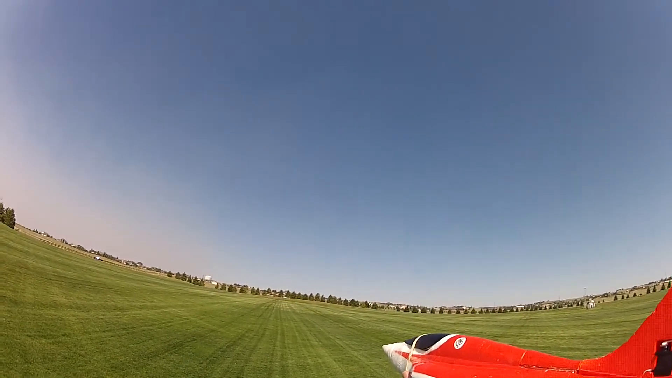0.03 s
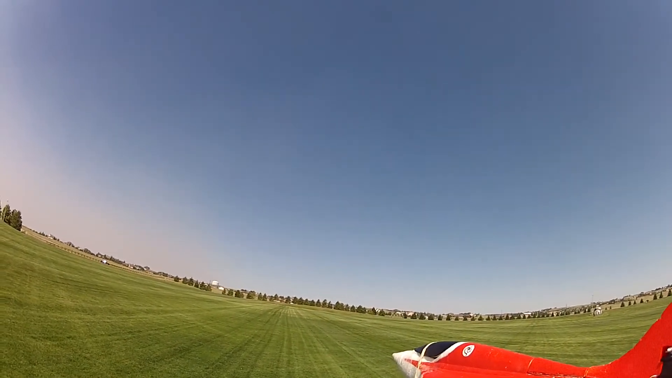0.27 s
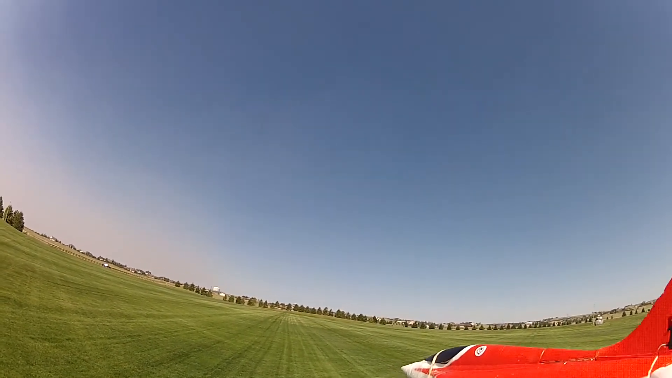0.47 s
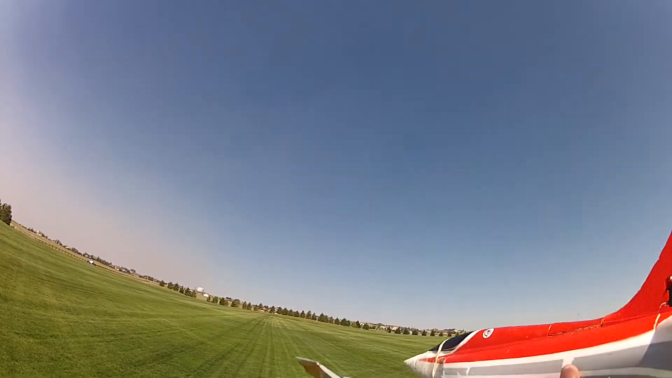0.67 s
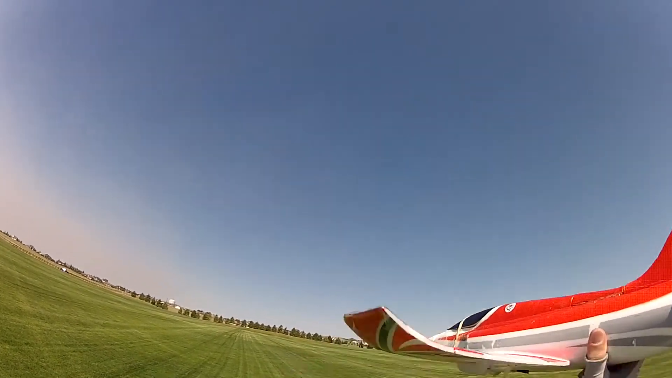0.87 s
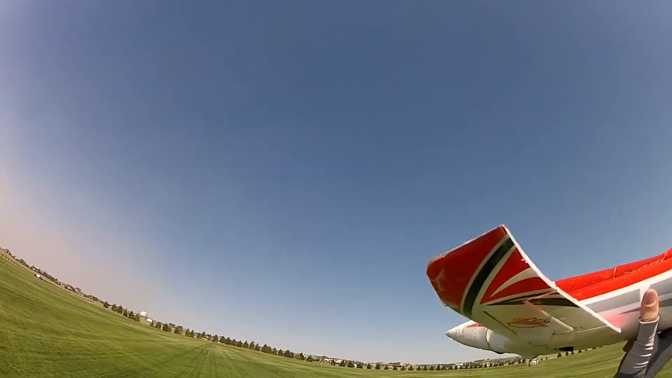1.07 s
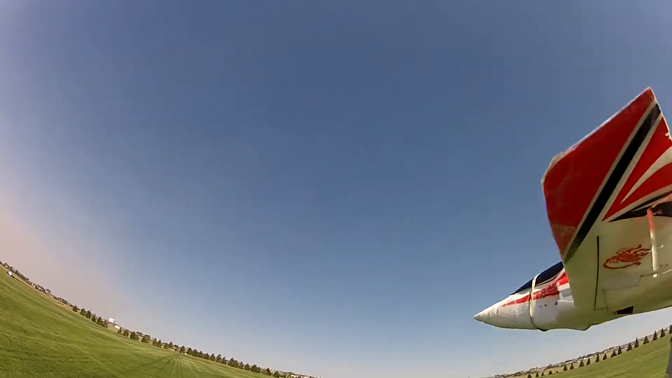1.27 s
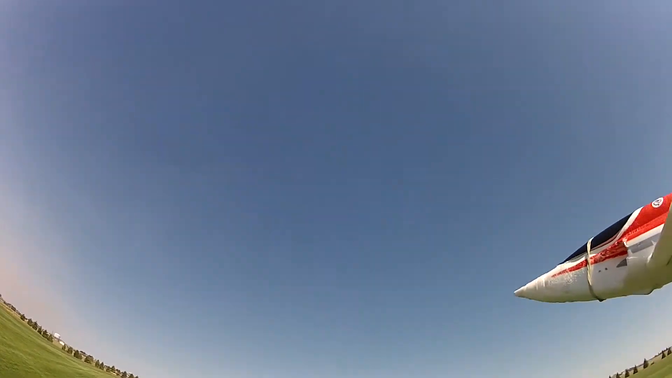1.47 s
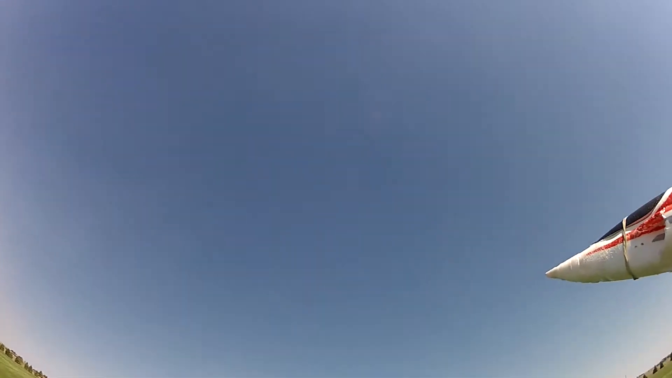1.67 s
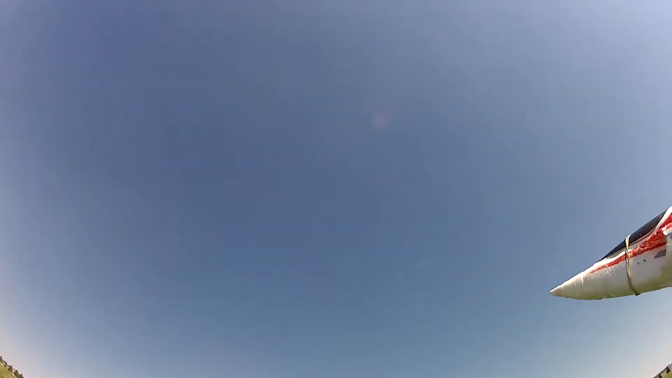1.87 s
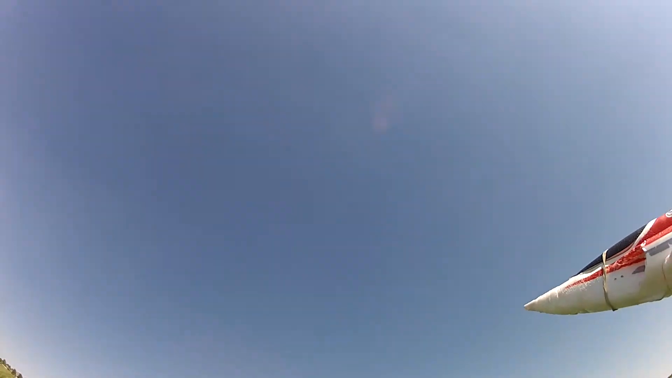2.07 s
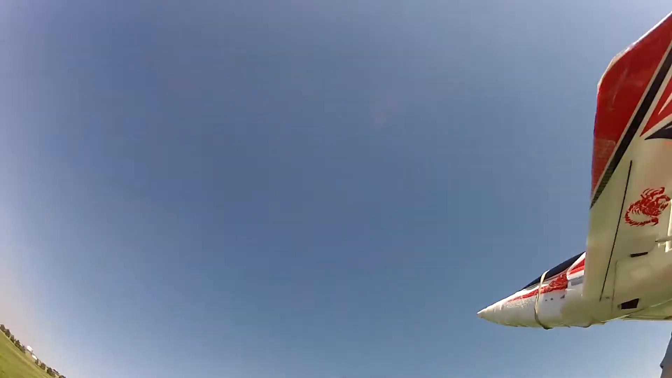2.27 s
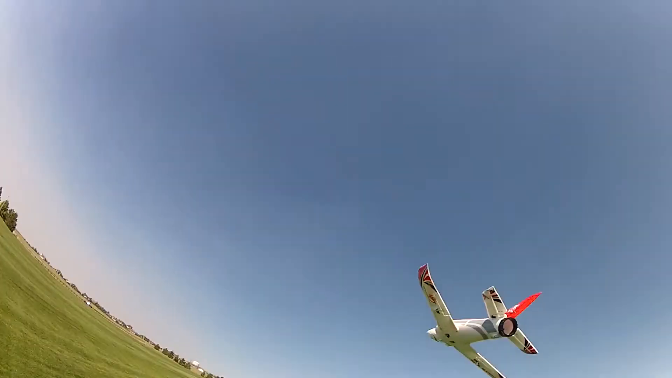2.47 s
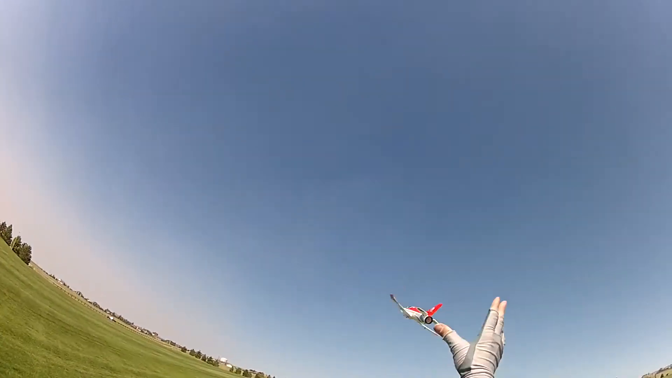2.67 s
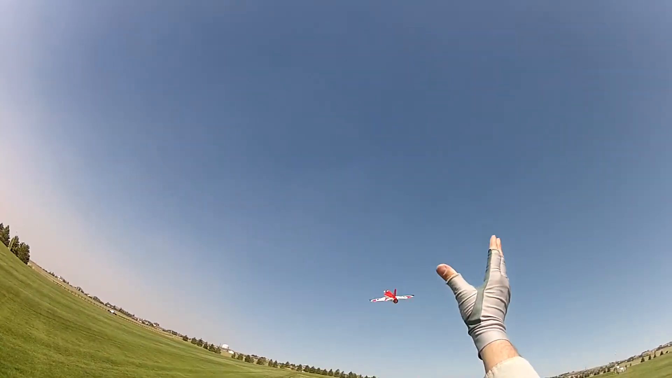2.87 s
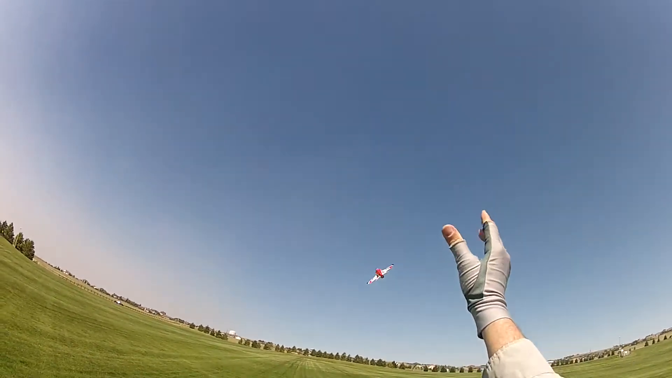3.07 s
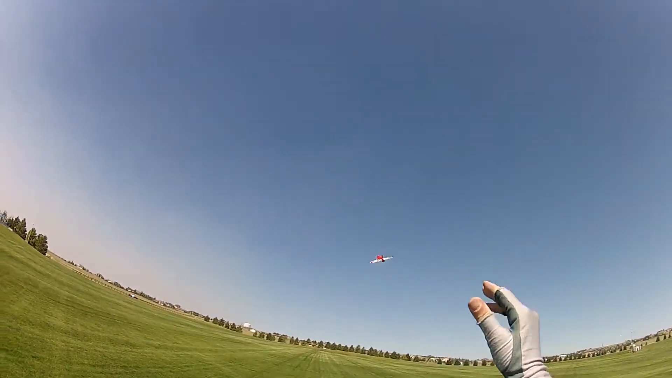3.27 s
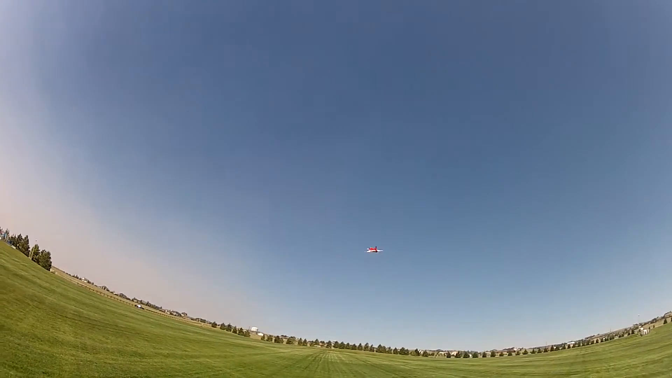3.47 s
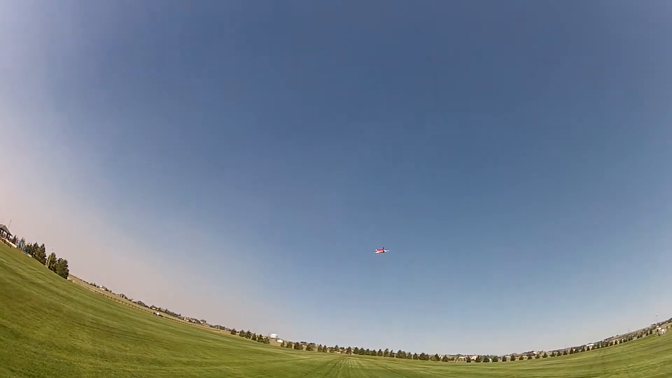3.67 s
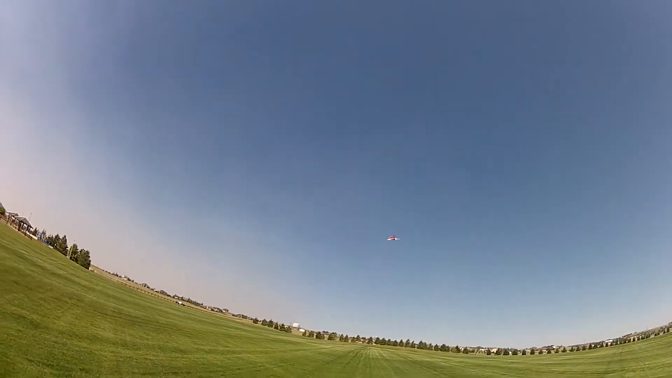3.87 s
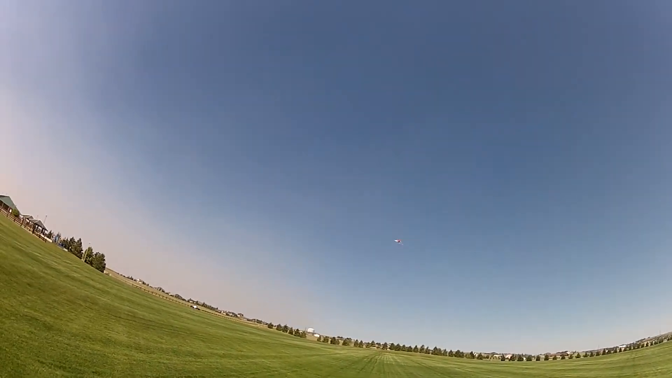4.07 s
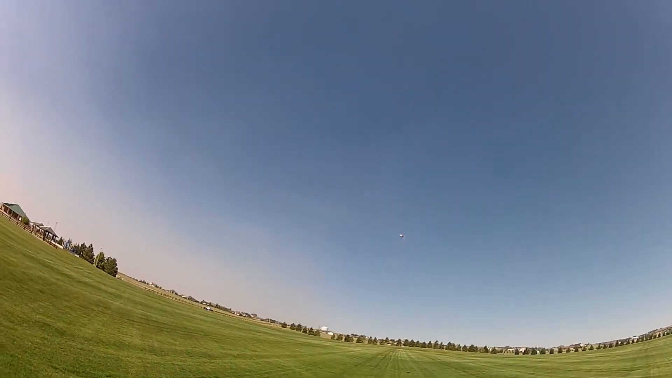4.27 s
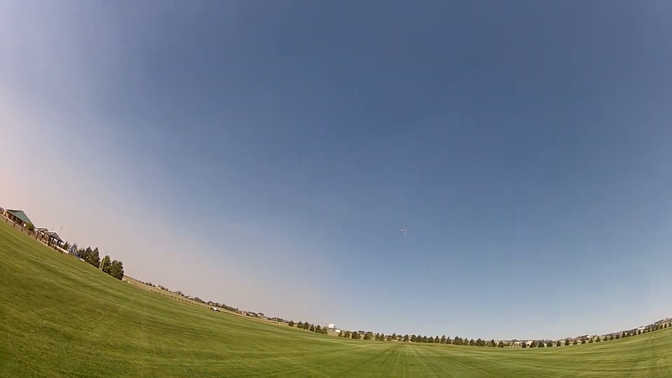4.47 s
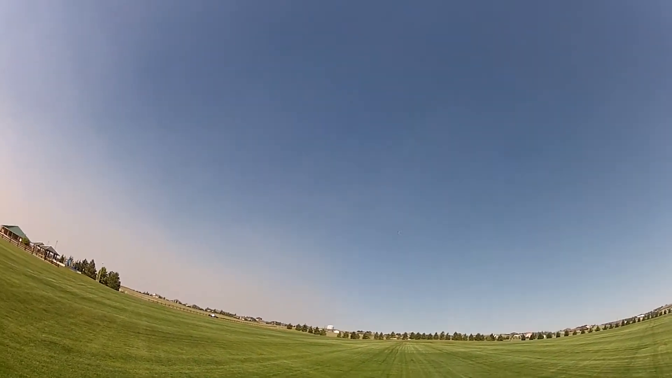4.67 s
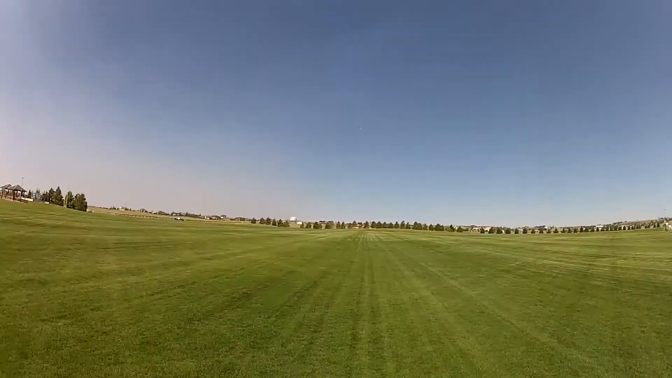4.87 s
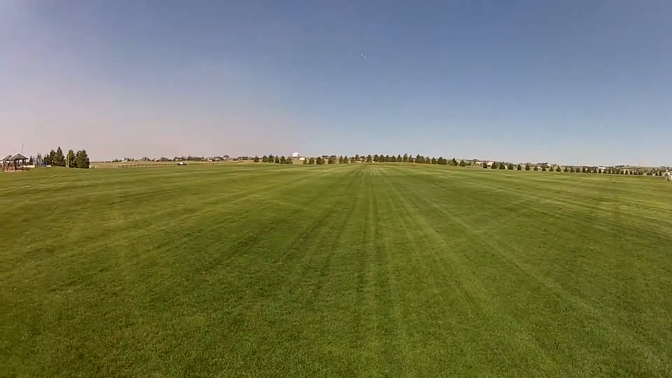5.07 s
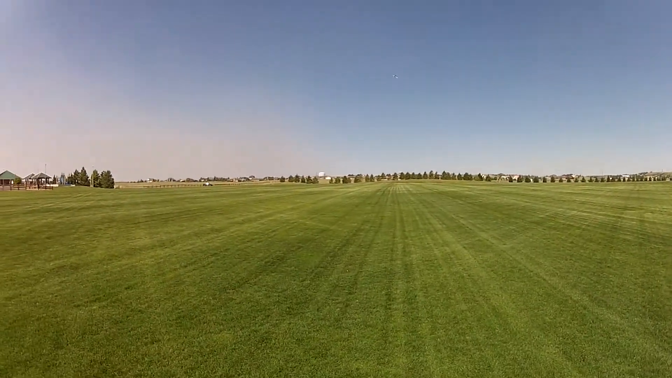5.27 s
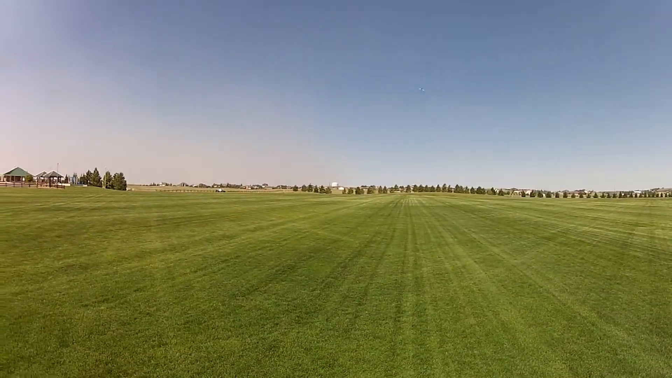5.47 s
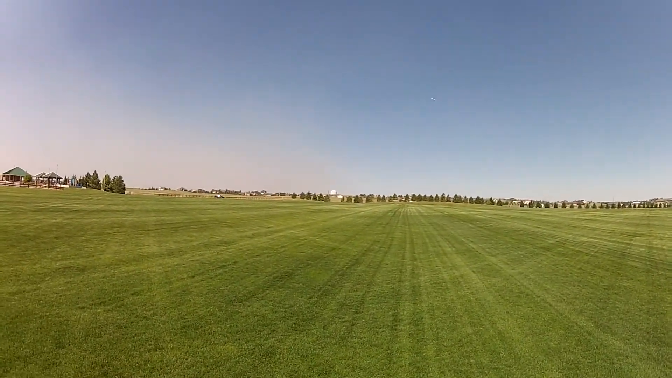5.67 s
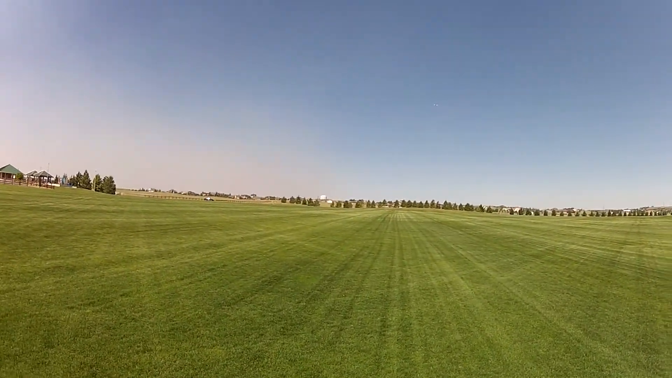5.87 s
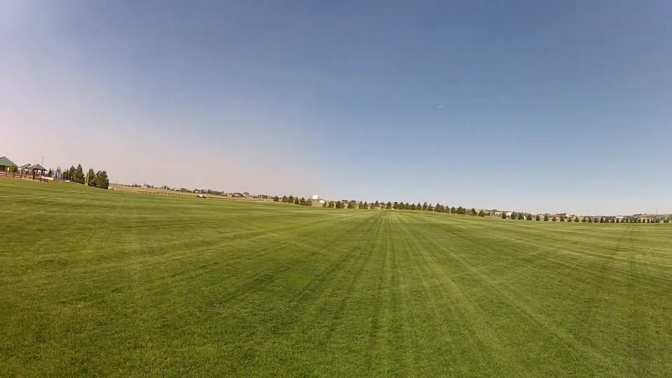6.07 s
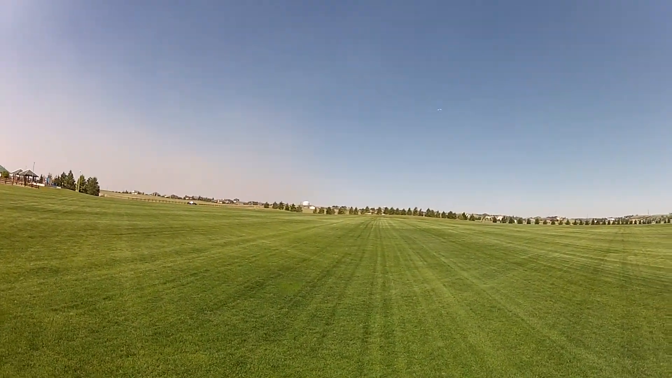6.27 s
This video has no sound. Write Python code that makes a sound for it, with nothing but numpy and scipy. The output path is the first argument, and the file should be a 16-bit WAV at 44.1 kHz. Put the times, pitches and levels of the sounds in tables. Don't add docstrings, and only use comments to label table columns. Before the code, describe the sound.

Outdoors on an open field, heard from a cased head-worn microphone with gritty, mirrored treble. From 0 to 0.3 s a small electric motor stutters and buzzes, chirping upward; by 0.5 s it has swept to a steady, piercing whine with a hum near 680 Hz and strong higher tones, over hissing, roaring duct air. It holds until 2.4 s, its tone shifting as the model is turned and raised from about 1.1 s, with low wind thumps and flutter. Around 2.5 s comes the throw: a deep double jolt, a gust and a flare of hiss. The whine dips slightly in pitch and fades fast. At 2.8 s a knock, at 3.0 s a soft bump and brief falling creak. A knock at 4.0 s; the distant whine wavers and thins, with a faint whistle. About 4.9-5.6 s, clicks, taps and a mount bump over hush and dying breeze until 6.3 s.

```python
import sys
import numpy as np
from scipy import signal
from scipy.fft import rfft, irfft
from scipy.io import wavfile
from scipy.ndimage import uniform_filter1d

SR = 44100
rng = np.random.default_rng(int(sys.argv[2]) if len(sys.argv) > 2 else 0)


def nominal_scale(level):
    x = np.asarray(level, float) / 20
    return 10 ** x


def put_to_file(sound):
    columns = np.atleast_2d(sound).T
    safe = np.clip(columns, -1, 1)
    whole_steps = np.round(safe * 32767)
    wavfile.write(sys.argv[1], SR, whole_steps.astype(np.int16))


N = 279064
T = np.arange(N) / SR


def in_time(rows):
    s, *columns = np.transpose(rows)
    return [np.interp(T, s, c) for c in columns]


def rms_one(x):
    return x / np.sqrt(np.mean(x ** 2) + 1e-20)


def band(x, low_hz, high_hz, order=2):
    return signal.sosfilt(signal.butter(order, [low_hz, high_hz], "band", fs=SR, output="sos"), x)


def noise():
    return rng.standard_normal(N)


def drift(rate_hz):
    r = np.exp(-80 * np.pi * rate_hz / SR)
    slow = signal.lfilter([1], [1, -2 * r, r * r], rng.standard_normal(N // 40 + 2002))[2000:]
    return np.interp(np.arange(N) / 40, np.arange(len(slow)), rms_one(slow))


def resonance(x, hz, width_hz):
    r = np.exp(-np.pi * width_hz / SR)
    b = np.array([1, 0, -1]) * (1 - r * r) / 2
    return signal.lfilter(b, [1, -2 * r * np.cos(2 * np.pi * hz / SR), r * r], x)


def sine(hz):
    return np.sin(2 * np.pi * np.cumsum(hz) / SR)


def swaying(rows):
    return sum(db * np.exp(-((T - s) / width_s) ** 2) for s, db, width_s in rows)


def surges(s, hold_s, db, rise_db_per_s, fall_db_per_s, calm_db):
    gain = nominal_scale(calm_db) + 0 * T
    for at, stay, top_db in zip(s, hold_s, db):
        near = slice(max(int((at - .5) * SR), 0), int((at + stay + .5) * SR))
        before = np.clip(at - T[near], 0, 1)
        after = np.clip(T[near] - at - stay, 0, 1)
        surge = nominal_scale(top_db - rise_db_per_s * before - fall_db_per_s * after)
        gain[near] = np.maximum(gain[near], surge)
    return uniform_filter1d(gain, size=round(SR * 4 / rise_db_per_s))


# frequency in Hz, density in dB per Hz.
FIELD_SPECTRUM = [(76, -33), (130, 5), (642, -9), (883, -15.5), (1960, -18.5), (2700, -19.5), (3020, -19),
                  (3270, -17), (3430, -21.5), (5110, -23.5), (5900, -29.5), (7670, -72), (13000, -120)]


def field():
    hz = np.maximum(np.fft.rfftfreq(N, 1 / SR), 1)
    corner_hz, corner_db = np.transpose(FIELD_SPECTRUM)
    shape_db = np.interp(np.log(hz), np.log(corner_hz), corner_db)
    hush = irfft(rfft(noise()) * nominal_scale(shape_db), N)
    return nominal_scale(-61.5 + 1.0 * drift(0.45)) * rms_one(hush)


# time in seconds, level in dB.
BREEZE = [(0, 2.5), (2.8, 0.2), (3.3, -4), (3.9, 1.5), (4.6, -3), (5.3, -4), (6.33, -8)]
CALM_DB = [-53, -49.5, -61]
# start in seconds, hold in seconds, deep buffet in dB, flutter in dB.
GUSTS = [(0, 0.054, -67, -41), (0.543, .01, -48, -60), (0.845, .01, -34.5, -41.5), (0.894, 0.044, -46, -42),
         (1.157, .01, -56, -40), (1.233, .03, -44.5, -56), (1.423, .02, -42.5, -57),
         (1.605, .04, -37, -47.5), (1.72, 0.008, -36, -50), (1.79, .04, -46, -42),
         (1.964, 0.0076, -38.5, -52), (2.13, 0.028, -44, -58), (2.303, .02, -42.5, -52),
         (2.386, 0.14, -27, -54), (2.68, 0.04, -37, -54), (2.788, .02, -42, -52), (3.104, .03, -38, -56),
         (3.438, .01, -49, -49), (3.564, 0.0072, -40.5, -52), (3.667, .01, -43.5, -43),
         (3.795, .01, -46, -55), (3.848, 0.024, -58, -40), (4.11, 0.035, -54, -45.5),
         (4.557, 0.19, -50, -50), (4.933, .01, -47, -50), (5.05, .01, -45, -56), (5.613, .01, -51, -58)]
# start in seconds, hold in seconds, rustle in dB.
WASH = [(.5, .05, -55.5), (1.55, 0.0084, -53.5), (1.853, 0.061, -52), (2.054, 0.34, -51),
        (2.537, .02, -51.5), (2.794, .01, -55.5), (3.8, 0.074, -53.5)]


def wind(lumpy_db=-1.5):
    rise, fall, wash_rise, wash_fall = 285, 170, 53, 49
    breeze_db, = in_time(BREEZE)
    deep_calm_db, flutter_calm_db, rustle_calm_db = [db + breeze_db for db in CALM_DB]
    deep_calm_db = deep_calm_db + np.interp(T, [.45, 0.74], [-19, 0])
    s, hold_s, deep_db, flutter_db = np.transpose(GUSTS)
    gust = nominal_scale(lumpy_db * drift(21))
    deep = rms_one(band(noise(), 9.9, 39.7) * nominal_scale(lumpy_db * drift(10)))
    flutter = rms_one(band(noise(), 38.0, 105.0, order=4) * gust)
    rustle = nominal_scale(-4.0) * rms_one(band(noise(), 163, 404) * gust)
    return (surges(s, hold_s, deep_db, rise, fall, deep_calm_db) * deep
            + surges(s, hold_s, flutter_db, rise, fall / 2, flutter_calm_db) * flutter
            + surges(*np.transpose(WASH), wash_rise, wash_fall, rustle_calm_db) * rustle)


# low Hz, high Hz, rattle share, t60 in seconds, rebound share.
CONTACTS = [
    (120, 3160, 0.9, 0.041, 0.37),
    (3480, 5350, 0.35, 0.011, .01),
    (1400, 2480, 1.9, 0.18, .01),
    (1000, 4000, .3, 0.01, .2),
    (150, 2300, .1, .006, .01),
]
# time in seconds, peak in dB.
TICKS = [
    [(2.799, -40.5), (4.0371, -36.5), (4.979, -39.5)],
    [(4.866, -50), (4.871, -51), (5.0254, -41.5), (5.0265, -46), (5.2067, -51), (5.283, -54), (5.585, -46)],
    [(5.031, -57), (5.085, -56)],
    [(5.112, -45), (5.598, -46)],
    [(5.2065, -38.5)],
]


def ticks():
    out, t = np.zeros(N), np.arange(3000) / SR
    push = 3 * np.exp(-t / .00007) + 0.45 * np.exp(-t / 0.0012)
    for (low_hz, high_hz, share, t60_s, rebound), hits in zip(CONTACTS, TICKS):
        for s, db in hits:
            burst = share * rng.standard_normal(3000) * nominal_scale(-60 * t / t60_s) - push
            burst = burst + rebound * np.interp(t - 0.001376, t, burst, left=0)
            at = round(s * SR)
            out[at:at + 3000] += 0.98 * nominal_scale(db) * band(burst, low_hz, high_hz, order=3)
    return out


# time in seconds, signed step, rise in seconds, ring in Hz, t60 in seconds.
BUMPS = [
    (2.48, -0.11, 0.00089, 60, 0.056),
    (2.5016, -0.16, 0.00093, 59.5, 0.0095),
    (3.044, 0.11, 0.0039, 31.3, 0.245),
    (5.023, -0.087, 0.0029, 30.3, 0.037),
    (5.0255, 0.072, 0.0013, 32, 0.083),
]


def bumps():
    out = np.zeros(N)
    for s, step, rise_s, hz, t60_s in BUMPS:
        since = np.clip(T - s, 0, 1)
        swing = np.cos(2 * np.pi * hz * since) * nominal_scale(-60 * since / t60_s)
        out += step * np.tanh(since / rise_s) ** 2 * swing
    return out


# time in seconds, frequency in Hz, level in dB.
CREAK = [(3.012, 270, -74), (3.02, 240, -44), (3.04, 223, -46), (3.06, 194, -41), (3.075, 170, -70)]


def creak():
    hz, db = in_time(CREAK)
    sounding = (T > CREAK[0][0]) & (T < CREAK[-1][0])
    return sounding * nominal_scale(db) * sine(hz)


# time in seconds, frequency in Hz, level in dB.
WHISTLE = [(4.0, 2050, -86), (4.3, 2075, -72), (4.5, 2076, -77), (4.7, 2150, -76), (4.82, 2160, -81),
           (5.0, 2130, -88)]


def whistle(waver=0.00376):
    hz, db = in_time(WHISTLE)
    return nominal_scale(db + 3.5 * drift(18)) * sine(hz * (1 + waver * drift(14)))


# arrival in seconds, departure in seconds.
POSES = [(0, .285), (.333, .41), (.49, .6), (.75, 1.07), (1.44, 1.52), (1.72, 2.41), (2.49, 2.53),
         (2.63, 2.66), (3.0, 4.4), (5.0, 6.3)]


def by_pose(gains):
    flown_s = np.clip(T - 2.47, 0, None)
    metres = 1 + 9.8 * flown_s + 0.87 * flown_s ** 2 / 2
    return np.interp(T, np.sort(np.ravel(POSES)), np.repeat(gains, 2)) / metres


# time in seconds, shaft speed in Hz.
SPIN = [(0, 12), (.045, 28), (.1, 79), (.13, 100), (.17, 120), (.25, 153), (.277, 207), (.306, 320),
        (.315, 360)]
# time in seconds, shaft speed as heard in Hz.
SHAFT = [(0.305, 330.8), (0.38, 534), (0.42, 621), (0.47, 666), (0.52, 679.5), (0.62, 684.8), (1, 682.7),
         (1.2, 680.7), (1.7, 677.2), (2.3, 675.2), (2.4, 675.4), (2.47, 667.9), (2.6, 660.4), (2.75, 657.3),
         (3.05, 654.1), (4.2, 650.8), (5.4, 644.4), (6.33, 641.2)]


def flow(idle_hz=140, full_hz=685):
    speed_hz = np.where(T < SHAFT[0][0], in_time(SPIN)[0], in_time(SHAFT)[0])
    return (np.maximum(speed_hz, idle_hz) / full_hz) ** 1.42


# frequency in Hz, width in Hz, dB held low, dB raised to throw, dB flying away.
FUSELAGE = [(553, 195, -4, -3, -1), (905, 102, -2, -1, 1), (1105, 110, -4.5, -2, -1.5)]
DUCT = [(1493, 113, -10.5, -5.5, -7), (1653, 210, -6.5, -2, -10), (2152, 124, -0.2, 2.3, 2.9),
        (2605, 28, -11, -49, -16)]
NOZZLE = [(2906, 153, -3, 4.5, -9), (3375, 135, 0.5, 2, 5), (3568, 138, 1.5, 4, 4), (3830, 180, 2, 5, 3),
          (3970, 430, -3.5, 0.5, -5), (4290, 320, 0, 0, -22), (4453, 210, 3, 0.5, -12.5),
          (5040, 820, -10, -8.5, -15.5)]
# fuselage rumble, duct roar or nozzle hiss at one metre, in dB per pose.
RUSH_DB = [
    [-47, -50, -45.5, -48, -52.5, -53.5, -52, -52, -54, -48.5],
    [-42.5, -44, -45, -45, -50.5, -49.5, -51, -47, -50.5, -51],
    [-62, -52.5, -49, -52, -56, -56.5, -54.5, -44, -48, -52],
]
ATTITUDE_S = [1.1, 1.45, 2.45, 2.7]
# time in seconds, pitch ratio.
RECEDING = [(2.42, 1), (2.7, .992), (6.33, .988)]
# time in seconds, level in dB, width in seconds.
RUSH_SWAYS = [(.5, -1, 0.059), (2.05, -1, 0.2), (2.53, 3.5, 0.033), (2.8, 1.5, 0.055), (3.74, 2.5, 0.3)]


def airflow(patchy_db=0.79):
    read_at = np.cumsum(in_time(RECEDING)[0])
    common_db = swaying(RUSH_SWAYS) + patchy_db * drift(23.0)
    strength = flow()
    out = 0
    for pose_db, modes, lift_db in zip(RUSH_DB, (FUSELAGE, DUCT, NOZZLE), (1.5, 2.5, 5.0)):
        white, rush = noise(), 0
        for i, (hz, width_hz, low_db, raised_db, away_db) in enumerate(modes):
            aim_db = np.interp(T, ATTITUDE_S, [low_db, raised_db, raised_db, away_db])
            gain = (-1) ** i * nominal_scale(aim_db + patchy_db * drift(2.7))
            rush = rush + gain * resonance(white, hz, width_hz)
        rush = rms_one(np.interp(read_at, np.arange(N), rush))
        out = out + by_pose(nominal_scale(pose_db)) * strength * nominal_scale(lift_db + common_db) * rush
    return out


# frequency in Hz, width in Hz, lift given to a passing tone in dB.
SHELL = [
    (903, 59, 1),
    (2159, 31.5, 1),
]


def through_shell(tones):
    return tones + sum(nominal_scale(lift_db) * resonance(tones, hz, width_hz) for hz, width_hz, lift_db in SHELL)


# shaft multiple, dB off resonance,
# flare in the low mode in dB, flare in the high mode in dB, flare width in octaves.
POLES = [(18, -66.5, 15.5, 21.5, 0.24), (9, -80, 23, 3, .5), (6, -78, 9, 3, 0.22)]
THROTTLE_DB = [5.5, 0.1, 9]


def pole_whine():
    spin_hz = in_time(SPIN)[0]
    turn = 2 * np.pi * np.cumsum(spin_hz * (1 + 0.0094 * drift(48.0))) / SR
    whine = 0
    for (k, db, *flare_db, octaves), kick_db in zip(POLES, THROTTLE_DB):
        near_db = sum(flare * np.exp(-(np.log2(k * spin_hz / hz) / octaves) ** 2)
                      for flare, (hz, _, _) in zip(flare_db, SHELL))
        falter_db = -17 * (k > 7) * np.clip((T - 0.19) / 0.033, 0, 1)
        drive_db = np.where(T < .276, falter_db, kick_db)
        whine = whine + nominal_scale(db + near_db + drive_db + 3.5 + 1.8 * drift(44)) * np.sin(k * turn)
    return through_shell(whine)


# time in seconds, low mode in dB, high mode in dB.
JOLTS = [(0, -49.5, -70), (.04, -50, -66), (.07, -62, -55), (.11, -50.5, -57), (.2, -70, -51),
         (0.281, -55, -43.5), (.298, -60, -56)]


def cogging():
    shake = noise() * nominal_scale(1.5 * drift(40))
    s, *jolt_db = np.transpose(JOLTS)
    return sum(surges(s, 0 * s, db, 1000, 350, calm_db) * rms_one(resonance(shake, hz, width_hz))
               for db, calm_db, (hz, width_hz, _) in zip(jolt_db, [-68, -66.5], SHELL))


def motor_start():
    return (pole_whine() + cogging()) * np.clip((.31 - T) / 0.0042, 0, 1)


TONE_DB = {1: [-54, -49, -54, -41, -36.5, -34, -37, -40, -57, -50], 2: [-74, -54.5, -59.5, -63.5, -58,
           -57.5, -69, -82, -76, -65], 3: [-55, -57, -46, -47, -32.5, -32.5, -38, -38.5, -50, -49.5], 5:
           [-80, -48.5, -37, -37, -45.5, -52, -36, -29.5, -38, -33.5], 6: [-68, -66, -51.5, -56.5, -60,
           -64.5, -58, -55, -66, -66], 8: [-95, -90, -93, -67, -88, -64, -70, -81, -86, -80]}
REVERSED = {3: range(6, 10), 5: range(4, 6)}
SWAYS = {1: [(.338, 6.5, .015), (.415, -7.5, 0.024), (.46, 5.5, 0.043), (.52, -11, 0.035), (.63, -3, .05),
         (2.425, -7, 0.04), (2.7, -6.5, .035), (2.8, 0.5, .04), (2.92, -11, 0.065)], 2: [(.335, 7.5, 0.021),
         (.385, 12, 0.014), (1.3, -8, 0.17)], 3: [(.44, 1, 0.018), (.52, 4, 0.027), (1.1, -6, 0.09),
         (1.55, 3.5, 0.17), (2.4, 1.5, 0.12), (2.72, -6.5, 0.089), (2.86, 1.5, 0.031), (4.3, 5.5, 0.34),
         (5.05, -9, 0.22), (5.6, 1, .2)], 5: [(.318, -13, 0.011), (.338, 9, 0.0076), (.485, 4, 0.012),
         (1.62, -6, 0.1), (1.73, 4.5, 0.071), (2.465, -9.5, 0.012), (2.503, -12, 0.0066),
         (2.565, -8.5, 0.02), (2.72, 0.5, .08), (3.15, -2.5, 0.38), (4.1, 4, 0.55), (5.0, -5.5, 0.46),
         (5.7, 2, 0.23), (1.22, -7.5, 0.048)], 8: [(1.56, -14, .04)]}


def tone_gain(k):
    lobes = [-1 if pose in REVERSED.get(k, ()) else 1 for pose in range(len(POSES))]
    return by_pose(nominal_scale(TONE_DB[k]) * lobes) * nominal_scale(swaying(SWAYS.get(k, ())))


# shaft multiple, place in TONE_DB (from 0) of the tone followed, offset in dB.
FAINT = [(4, 3, -39), (7, 4, -5.5)]


def fan(wobble_db=0.68, far_wobble_db=1.4, jitter=0.00039, spool_rough_db=2.6):
    levels = [tone_gain(k) for k in TONE_DB]
    orders = list(zip(TONE_DB, levels))
    orders += [(k, levels[place] * nominal_scale(db)) for k, place, db in FAINT]
    turn = 2 * np.pi * np.cumsum(in_time(SHAFT)[0] * (1 + jitter * drift(12.7))) / SR
    flicker_db = np.interp(T, [2.4, 3.2], [wobble_db, far_wobble_db])
    rough_db = spool_rough_db * np.interp(T, [.4, .5, 2.44, 2.48, 2.56, 2.64], [1, 0, 0, 1, 1, 0])
    whine = 0
    for k, gain in orders:
        unsteady_db = flicker_db * drift(8.6) + rough_db * drift(63)
        whine = whine + gain * nominal_scale(unsteady_db) * np.sin(k * turn + k * k)
    return np.sqrt(2) * through_shell(whine * np.clip((T - SHAFT[0][0]) / 0.0065, 0, 1))


def scene():
    mount = ticks() + bumps() + creak()
    return (field() + wind() + mount + whistle() + airflow() + motor_start() + fan())[None]


def band_limit(x):
    return signal.sosfilt(signal.butter(12, 15710, fs=SR, output="sos"), x)


def record(dry):
    slow = signal.resample_poly(dry, 40, 147, axis=1)
    held = np.repeat(slow, 4, axis=1)[:, 1:]
    x = signal.resample_poly(held, 147, 160, axis=1)[:, :N]
    x = signal.sosfiltfilt(signal.ellip(10, .3, 30, 15283, fs=SR, output="sos"), x)
    mix = np.pad(x, ((0, 0), (0, N - x.shape[1])))
    return band_limit(mix)


dry = scene()
out = record(dry)
put_to_file(out)
```